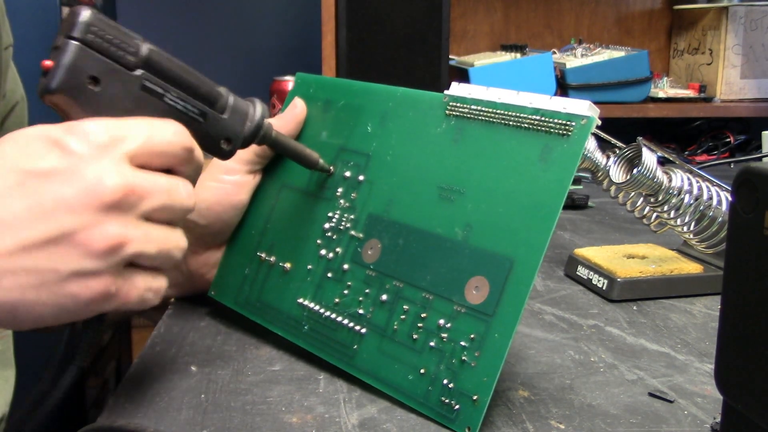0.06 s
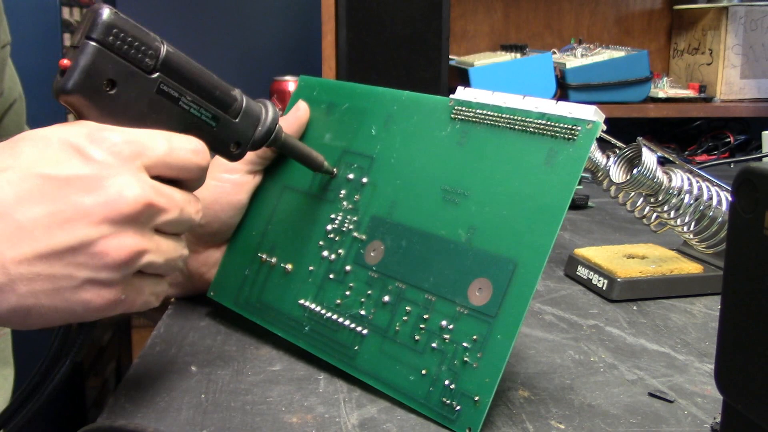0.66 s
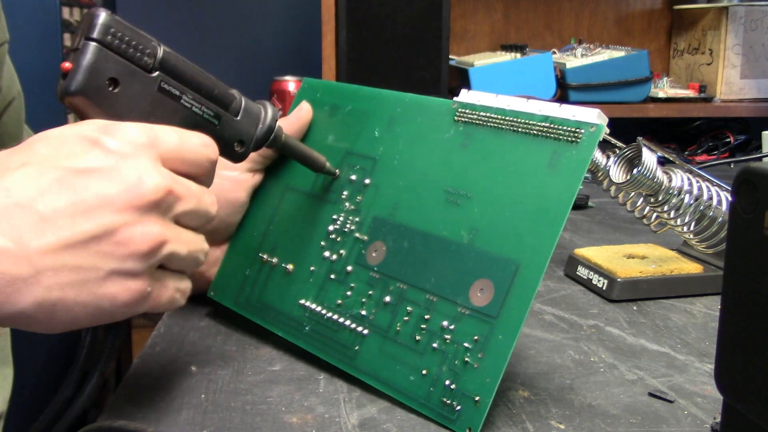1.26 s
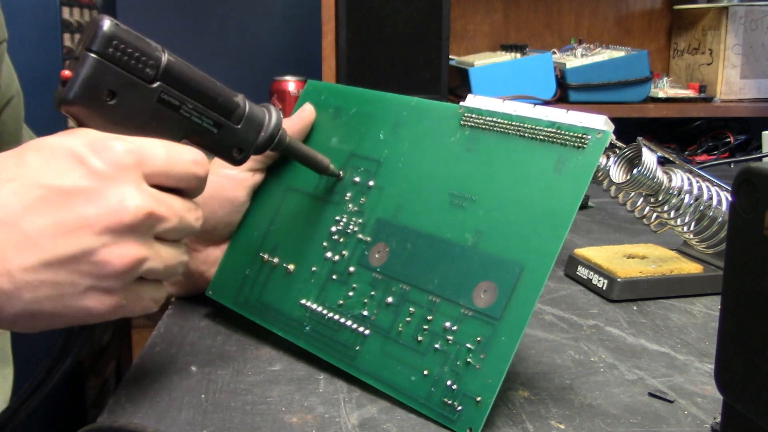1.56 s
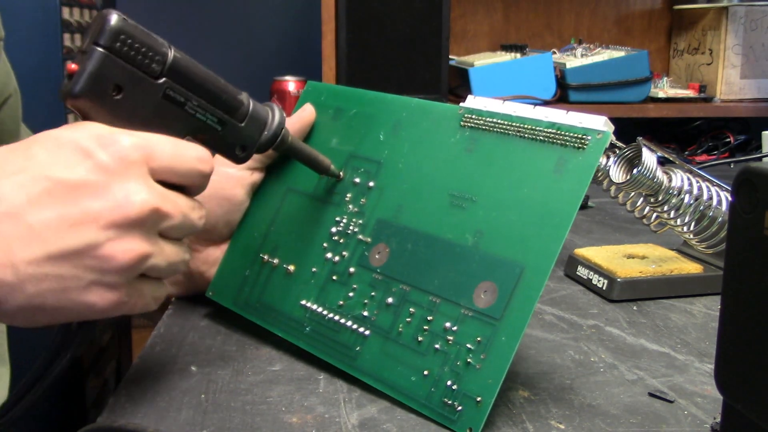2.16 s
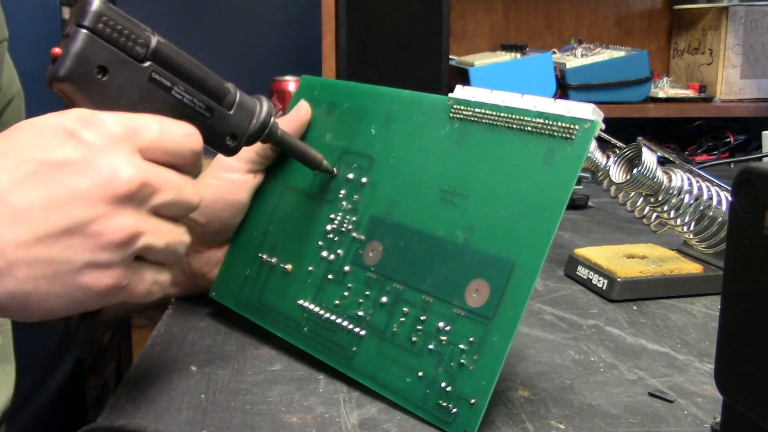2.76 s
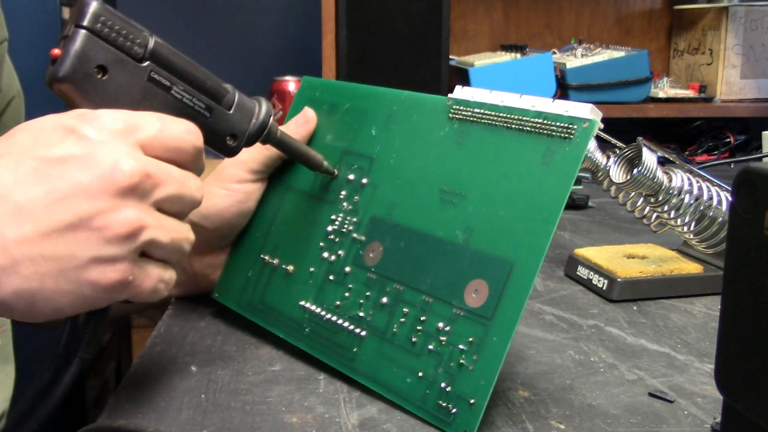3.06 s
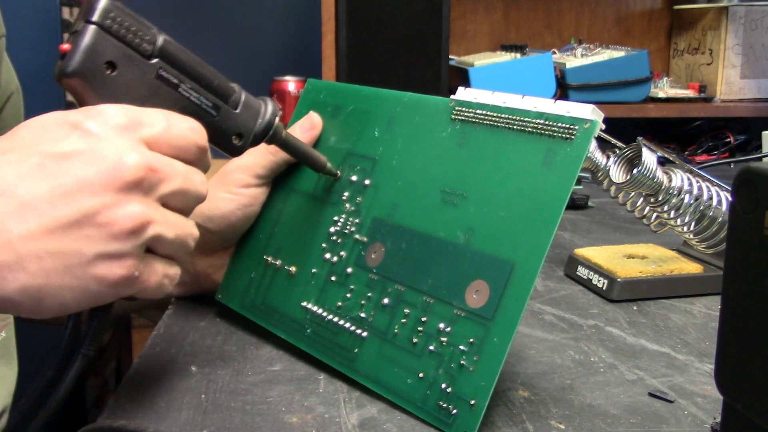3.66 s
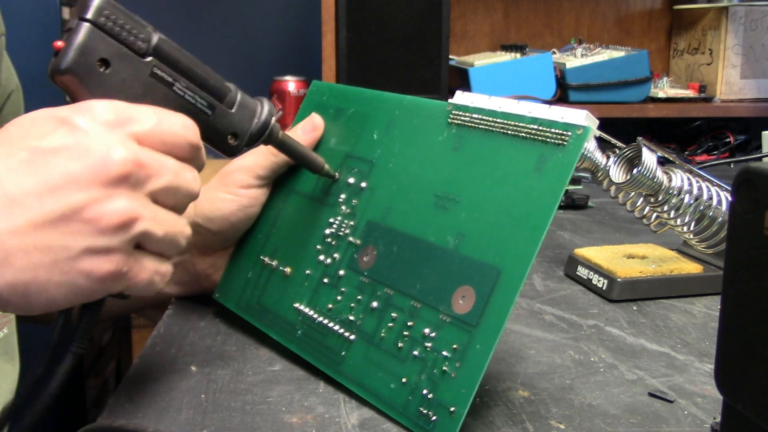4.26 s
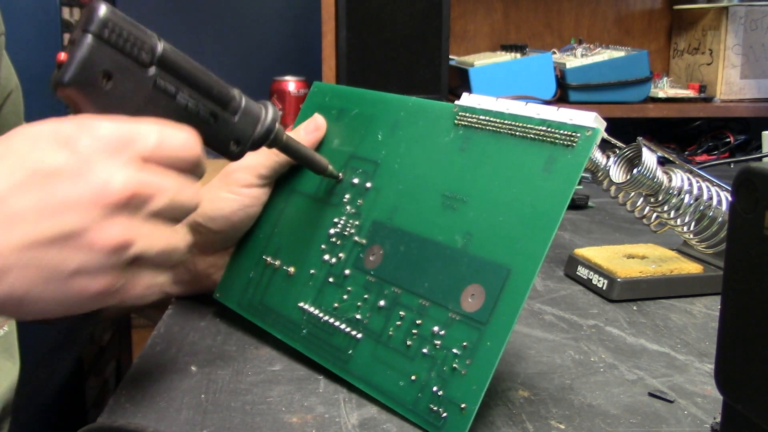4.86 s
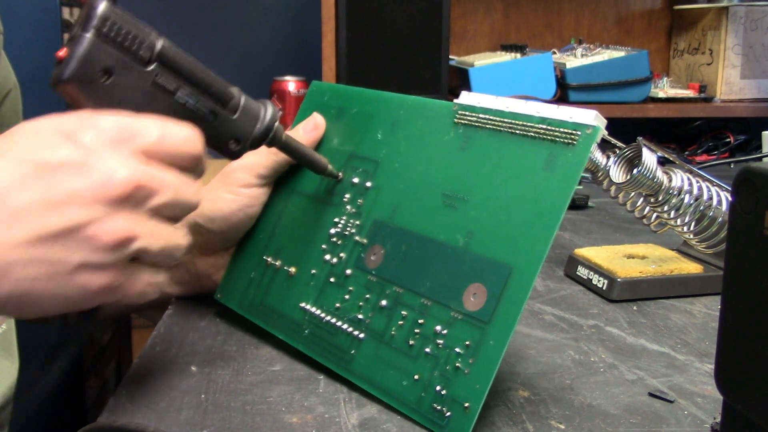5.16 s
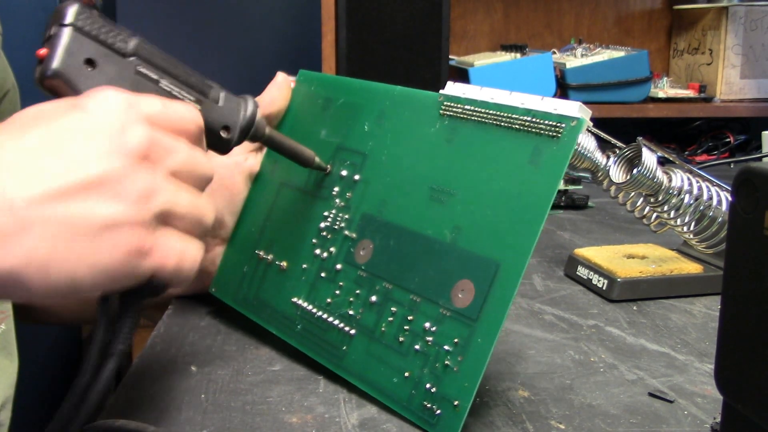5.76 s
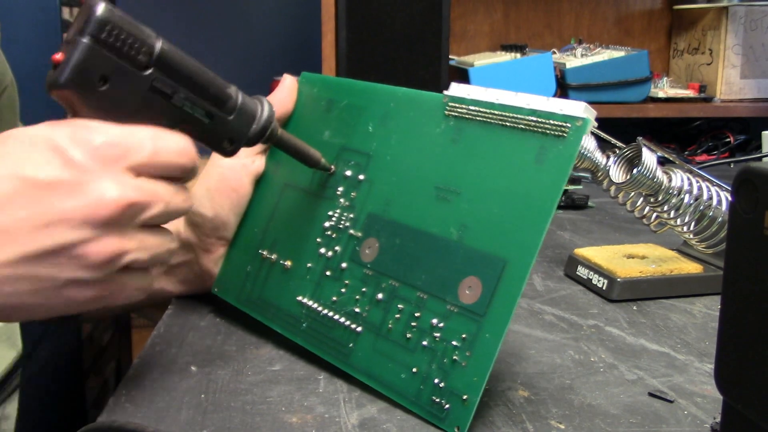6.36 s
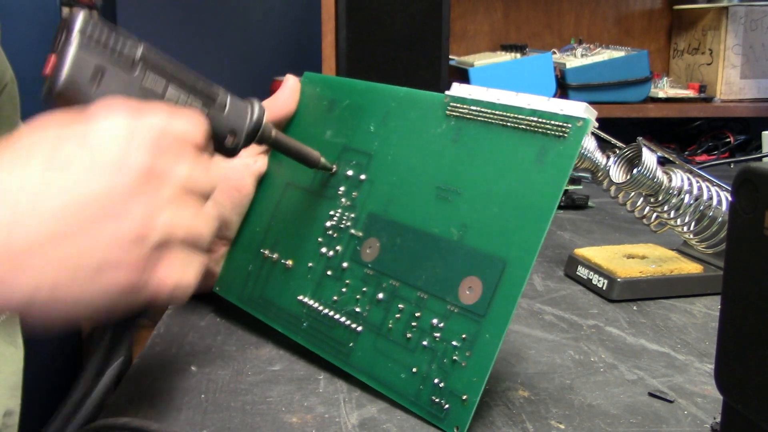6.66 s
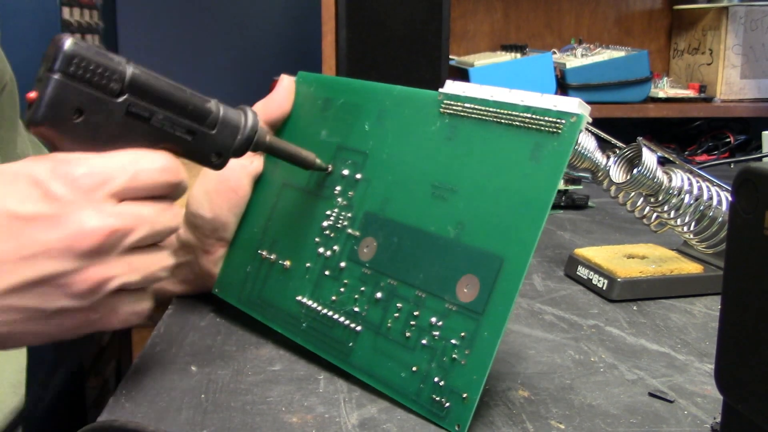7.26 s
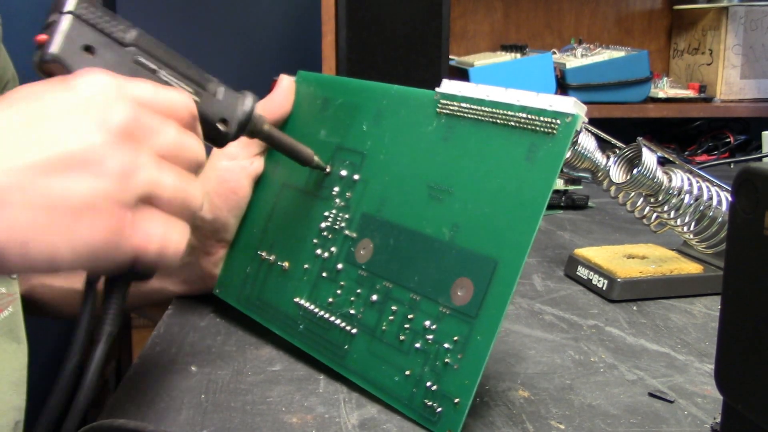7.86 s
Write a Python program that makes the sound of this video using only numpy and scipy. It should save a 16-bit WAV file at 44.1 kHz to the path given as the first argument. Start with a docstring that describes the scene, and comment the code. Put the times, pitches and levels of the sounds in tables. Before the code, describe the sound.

At first there is only a faint workshop hum. At about 0.6 seconds the plastic trigger of a desoldering gun snaps, and a small electric vacuum pump starts with a puff of air, reaching speed by 0.8 seconds. It runs close by with a rapid knocking, a steady motor hum and a bright, pulsing hiss, with a soft burble and a few tiny spits of air early on. Around 2 seconds molten solder slurps up the nozzle with a brief, rough, rising whistle. Between about 2.2 and 3.5 seconds some knocks falter, then the strokes become slightly harder and more even as the suction builds. The pump case gives short rattles near 2.7, 3.8, 5.2 and 7 seconds, and again just before the end. The pump is still running steadily at about 8 seconds.

```python
"""The diaphragm pump of a desoldering station runs on a workbench, started by a click of the trigger.
Each shaft turn knocks the housing into free vibration, claps a valve shut and drives two hissing gasps
of air. As the vacuum builds, the strokes grow harder and more even and the motor hum firms up.
Now and then a knock falters or the case rattles, and once molten solder slurps up the nozzle.
Beneath it all lies the faint hum of the workshop."""
import sys
import numpy as np
from scipy import signal
from scipy.fft import rfft, irfft, next_fast_len
from scipy.io import wavfile

SR = 44100
rng = np.random.default_rng(int(sys.argv[2]) if len(sys.argv) > 2 else 0)


def put_to_file(sound):
    """Save the sound as 16-bit audio at rate SR, in the file named by the first command-line argument."""
    columns = np.atleast_2d(sound).T  # one column per channel
    safe = np.clip(columns, -1, 1)
    whole_steps = np.round(safe * 32767)
    wavfile.write(sys.argv[1], SR, whole_steps.astype(np.int16))


N = 348831
TIME = np.arange(N) / SR
FFT_SIZE = next_fast_len(N + SR // 2)  # room for filter tails
HZ = np.fft.rfftfreq(FFT_SIZE, 1 / SR)

SHAFT_HZ, FIRST_KNOCK_S = 28.8513, .7833
START_S, SPIN_UP_S = .617, .165
SCATTER_OPEN_DB, SCATTER_TIGHT_DB = 1.3, .5  # stroke scatter: line open, full vacuum

# modes of the housing: f/Hz, level/dB, T60/s
HOUSING_MODES = [(149.4, -20, 0.036), (288, -15.5, 0.096), (313.6, -17, 0.088), (340, -6, 0.023),
                 (413.5, -10, 0.033), (424.8, -22, 0.16), (538.5, -25, 0.13), (721.7, -5.5, 0.028),
                 (782.6, -4, 0.021), (805.5, -13, 0.045), (969.4, -7.5, 0.073), (1306, -13, 0.021),
                 (1336, -12.5, 0.033)]
# knocks that are unusually hard or weak: t/s, number of turns, level change/dB
ODD_STROKES = [(.783, 2, 2.5), (2.239, 1, -7), (2.378, 1, -9), (2.586, 2, -4), (2.863, 2, 2),
               (3.036, 3, -9), (3.175, 1, 3), (3.279, 2, -9), (3.418, 1, -8)]
# modes of the valve flap: f/Hz, level/dB, T60/s
FLAP_MODES = [(1320, -21, 0.02), (1750, -29.5, 0.03), (2846, -23.5, 0.016), (3530, -31.5, .014),
              (5950, -32, 0.013)]
# resonances of the valve chamber: f/Hz, bandwidth/Hz, level/dB
CHAMBER_RESONANCES = [(423, 42, 8), (735, 53, 8), (992, 39, -1.5), (1296, 118, 4.5), (1710, 17.4, 5.5),
                      (2360, 65, -8), (2636, 220, -13), (3300, 120, -14), (4130, 150, -18),
                      (5450, 370, -16.5), (6030, 810, -18.5)]
# spits of air at the valve: t/s, level/dB
SPIT_EVENTS = [(1.048, -19.5), (1.082, -16), (1.152, -21), (1.185, -22), (2.050, -22), (2.154, -22),
               (3.126, -26), (3.335, -22.5), (3.438, -23)]
# resonances of the spits: f/Hz, bandwidth/Hz, level/dB
SPIT_RESONANCES = [(2760, 120, 2.5), (3700, 230, 0), (5520, 570, 1), (6130, 150, 1)]
# motor harmonics: multiple of the shaft rate, level with the line open/dB, level at full vacuum/dB
MOTOR_HARMONICS = [(4, -49, -44.5), (6, -53, -37.5), (8, -35, -34), (10, -33, -31.5), (14, -28.5, -29.5),
                   (17, -37, -35)]
# spectrum of the air hiss: f/Hz, relative level/dB
HISS_SPECTRUM = [(900, -7), (1800, -11), (2800, -4), (4000, -7), (4800, -11), (5600, -5.5), (7200, 2),
                 (11000, -2), (11800, -7), (13200, -3.5), (14500, -23), (15800, -30)]
# resonances of the air path: f/Hz, bandwidth/Hz, level/dB
PIPE_RESONANCES = [(2414, 104, 7.5), (2880, 150, -3), (3960, 80, 7), (5460, 140, 2.5), (5890, 82, 0),
                   (7640, 140, -11), (8320, 92, -5), (8670, 88, 4), (9370, 71, 1), (10250, 170, 4),
                   (11020, 370, 5.5), (12050, 210, 3), (12760, 130, -3), (13800, 150, -7), (14200, 130, 0)]
# spectrum of the churning motor: f/Hz, relative level/dB
CHURN_SPECTRUM = [(40, -57), (110, -15), (165, -17), (220, -7), (300, -1), (410, -8.5), (600, -12.5),
                  (740, -2.5), (830, -8.5), (970, -2), (1100, -9.5), (1400, -12), (2100, -29), (5000, -32)]
# resonances of the open line: f/Hz, bandwidth/Hz, level/dB
LINE_RESONANCES = [(255, 75, -0.5), (407, 43, -5.5)]
# fits of rattling: t/s, duration/s, level/dB
RATTLE_EVENTS = [(.77, 0.066, -24.5), (2.687, 0.081, -19.5), (3.803, 0.1, -15), (5.23, 0.08, -19),
                 (6.979, 0.085, -17), (7.353, 0.1, -22.5), (7.862, 0.094, -18)]
# spectrum of the chattering case: f/Hz, relative level/dB
CHATTER_SPECTRUM = [(40, -31), (105, -4), (200, 7.5), (380, 6.5), (600, -2), (750, 5.5), (1300, -2),
                    (2200, -7.5), (4000, -12.5), (6500, -16), (14000, -32)]
# low resonances of the case: f/Hz, bandwidth/Hz, level/dB
CASE_RESONANCES = [(116, 22, -3.5), (402, 38, 2)]
# clicks of the trigger: t/s, level/dB
CLICK_EVENTS = [(.193, -39), (0.517, -38), (0.5604, -13)]
# resonances of the trigger: f/Hz, bandwidth/Hz, level/dB
TRIGGER_RESONANCES = [(940, 370, 0.5), (2620, 1100, 0), (4240, 650, 2), (5460, 500, 6), (6400, 500, -6),
                      (7500, 310, 0), (9000, 1200, -32), (12400, 1200, -17)]
# hum of the workshop: f/Hz, level/dB
HUM_TONES = [(140, -52.5), (221, -56), (291, -68), (506, -56.5)]
# spectrum of the room noise: f/Hz, relative level/dB
ROOM_SPECTRUM = [(25, -18), (60, -27), (90, -29), (130, -5), (175, -14), (310, -12.5), (400, -15.5),
                 (515, -17), (660, -21), (1300, -27), (2500, -36.5), (7000, -46.5), (15000, -54)]
# echoes that differ between left and right: f/Hz, level/dB
SIDE_SPECTRUM = [(100, -36), (300, -56.5), (600, -19.5), (2000, -35), (4000, -22.5), (8000, -14),
                 (15000, -11)]
# stereo balance: f/Hz, left minus right level/dB
BALANCE = [(2500, 0), (4000, -.5), (8000, -2), (15000, -1.4)]


def knocks(open_db=-2.4, tight_db=.31, limp_s=.00019, jitter_s_per_db=.00008):
    """Impact excitation: the connecting rod rings the housing once a turn, harder under load."""
    times, limp = turns()
    size, late = rng.standard_normal((len(times), 2)).T
    scatter_db = loaded(times, SCATTER_OPEN_DB, SCATTER_TIGHT_DB)
    db = loaded(times, open_db, tight_db) + scatter_db * size
    for at, count, change_db in ODD_STROKES:
        first = np.argmin(abs(times - at))
        db[first:first + count] += change_db
    onsets = times + limp_s * limp + jitter_s_per_db * scatter_db * late
    return strike(onsets, spin(times) ** 2 * amp(db), ring(HOUSING_MODES))


def valve(clap_db=-30, thud_db=-16, thud_hz=330, thud_t60=.053, lag_s=.0198, decay_s=.0042):
    """Transient excitation: the flap shuts with a tick and a thud, and a puff sounds the chamber."""
    times, limp = turns()
    size, late = rng.standard_normal((len(times), 2)).T
    scatter_db = loaded(times, SCATTER_OPEN_DB, SCATTER_TIGHT_DB)
    force = amp(loaded(times, -9.5, -4.5) + .6 * limp + scatter_db * size)
    onsets = times + lag_s + .0002 * scatter_db * late  # on the return stroke
    t = TIME[:SR // 20]
    puff = noise() * strike(onsets, force, np.exp(-t / decay_s) * (1 - np.exp(-t / .0006)))
    clap = amp(clap_db) * unit(colour(puff, resonances(CHAMBER_RESONANCES)))
    thud = strike(onsets, force, -ring([(thud_hz, thud_db, thud_t60)]))
    tick = strike(onsets, amp(scatter_db * size - 2 * limp), ring(FLAP_MODES))
    return clap + thud + tick


def spits(decay_s=.0048):
    """Resonant noise bursts: on a few return strokes the valve spits air more sharply."""
    times, db = np.transpose(SPIT_EVENTS)
    envelope = strike(times, amp(db), np.exp(-TIME[:SR // 20] / decay_s))
    return envelope * shaped_noise(resonances(SPIT_RESONANCES))


def motor(waver_rad=.067, waver_hz=6, swell_db=1.5, swell_hz=1.34):
    """Harmonics of rotation: tones at multiples of the shaft rate waver and shift balance with load."""
    angle = 2 * np.pi * SHAFT_HZ * (TIME - FIRST_KNOCK_S) + waver_rad * drift(waver_hz)
    tones = 0
    for order, open_db, tight_db in MOTOR_HARMONICS:
        db = loaded(TIME, open_db, tight_db) + swell_db * drift(swell_hz)
        tones = tones + amp(db) * np.sin(order * angle)
    return spin(TIME) * np.sqrt(2) * tones


def inrush(hz=720, db=-31, lag_s=.017, width_s=.027):
    """Starting transient: the motor sings briefly as the current comes on."""
    envelope = np.exp(-((TIME - START_S - lag_s) / width_s) ** 2)
    return amp(db) * envelope * np.sin(2 * np.pi * hz * TIME)


def gasps(lag_s, width_s, db, limp_db, scatter_db=1, jitter_s=.00066):
    """Pulsating flow: one port passes a Gaussian puff each turn, stronger and weaker in alternation."""
    times, limp = turns()
    size, late = rng.standard_normal((len(times), 2)).T
    puff = np.exp(-((TIME[:SR // 15] - 1 / SHAFT_HZ) / width_s) ** 2)
    onsets = times + lag_s - 1 / SHAFT_HZ + jitter_s * late
    return strike(onsets, amp(db + scatter_db * size - limp_db * limp), puff)


def hiss(db=-28.5, leak=.22, broadband=1.04):
    """Modulated flow noise: intake and exhaust hiss in turn through the air path, over a steady leak."""
    intake = gasps(lag_s=.0071, width_s=.0065, db=.22, limp_db=-.3)
    exhaust = gasps(lag_s=.0253, width_s=.0029, db=0, limp_db=1.4)
    flow = (leak + intake + exhaust) * draught(open_db=-.8, tight_db=-.3, start_db=11)
    path = amp(spectrum(HISS_SPECTRUM)) * (broadband + resonances(PIPE_RESONANCES))
    comb = 1 + .37 * echoes(length_s=.012, count=14)  # reflections off the bench and shelves
    return amp(db) * unit(colour(noise() * flow, path * comb))


def churn():
    """Broadband machine noise: the motor churns low beneath the hiss."""
    envelope = draught(open_db=-24.5, tight_db=-24, start_db=-8)
    return envelope * shaped_noise(amp(spectrum(CHURN_SPECTRUM)))


def burble(db=-27):
    """Flow-driven resonance: air burbles in the open line and dies away as the vacuum builds."""
    envelope = amp(db) * spin(TIME) * (1 - vacuum(TIME))
    return envelope * shaped_noise(resonances(LINE_RESONANCES) ** 2)


def rattles(blows_per_s=500, grain=.42, boom_db=-4):
    """Random impacts: the case chatters in short fits of small blows and booms at its resonances."""
    envelope = sum(amp(db) * np.sin(np.pi * np.clip((TIME - at) / length, 0, 1))
                   for at, length, db in RATTLE_EVENTS)
    blows = noise() * (rng.random(N) < blows_per_s / SR)
    chatter = unit(colour(grain * unit(blows) + noise(), amp(spectrum(CHATTER_SPECTRUM))))
    boom = amp(boom_db) * shaped_noise(resonances(CASE_RESONANCES))
    return envelope * (chatter + boom)


def slurp(at_s=1.95, clogged_hz=3260, cleared_hz=4100, glide_s=.085, whistle_s=.19, burst_s=.024):
    """Flow noise and tones: air bursts through molten solder; two whistles rise as the bore clears."""
    age = np.maximum(TIME - at_s, 0)
    attack = np.minimum(age / .016, 1)
    release = np.exp(-np.maximum(age - .22, 0) / .077)
    hz = cleared_hz + (clogged_hz - cleared_hz) * np.exp(-age / glide_s)
    phase = 2 * np.pi * np.cumsum(hz) / SR
    upper = np.sin(phase + .8 * drift(width_hz=90))  # phase noise roughens the tones
    lower = np.sin(.54 * phase + 1.6 * drift(width_hz=90))
    whistles = amp(-34.5) * np.exp(-(age / whistle_s) ** 4) * (upper + lower)
    spray = shaped_noise(resonances([(2200, 310, 4), (2660, 790, 8), (3350, 1000, 3)]) ** 2)
    spray_db = -33 + 10 * np.exp(-(age / burst_s) ** 4)
    return attack * release * (amp(spray_db) * spray + whistles)


def trigger(attack_s=.00074, decay_s=.0013, tail_db=-24, tail_s=.04):
    """Impact and reflection: the switch snaps in its plastic grip; the bench returns a short tail."""
    times, db = np.transpose(CLICK_EVENTS)
    t = TIME[:SR // 8]
    decay = np.exp(-t / decay_s) + amp(tail_db) * np.exp(-t / tail_s)
    snap = decay * (1 - np.exp(-t / attack_s))
    return strike(times, amp(db), snap) * shaped_noise(resonances(TRIGGER_RESONANCES))


def workshop(room_db=-47.5, waver=.28):
    """Ambient noise floor: quiet room noise and hum tones under slow amplitude modulation."""
    hum = 0
    for hz, db in HUM_TONES:
        swell = 1 + waver * shaped_noise(np.exp(-HZ / 8))
        hum = hum + amp(db) * np.sqrt(2) * swell * np.sin(2 * np.pi * (hz * TIME + rng.random()))
    return hum + amp(room_db) * shaped_noise(amp(spectrum(ROOM_SPECTRUM)))


def turns():
    """Period doubling: the time of each shaft turn, and a limp whose sign alternates between turns."""
    n = np.arange(-4, 207)
    return FIRST_KNOCK_S + n / SHAFT_HZ, (-1.) ** n


def spin(t):
    """Run-up: a linear ramp of strength, 0 to 1, as the motor starts."""
    return np.clip((t - START_S) / SPIN_UP_S, 0, 1)


def vacuum(t, midpoint_s=2.65, build_s=.4):
    """Logistic growth: the share of full vacuum, 0 to 1, which loads the pump."""
    return .5 + .5 * np.tanh((t - midpoint_s) / (2 * build_s))


def loaded(t, at_open, at_tight):
    """Load dependence: a value moves from its open-line to its full-vacuum setting."""
    return at_open + (at_tight - at_open) * vacuum(t)


def draught(open_db, tight_db, start_db, attack_s=.0084, settle_s=.016):
    """Relaxation: the flow opens with the motor and settles to the level set by the load."""
    age = np.maximum(TIME - START_S, 0)
    db = loaded(TIME, open_db, tight_db) + start_db * np.exp(-age / settle_s)
    return np.minimum(age / attack_s, 1) * amp(db)


def ring(modes):
    """Modal superposition: damped sinusoids, with neighbouring modes in opposite phase."""
    t = TIME[:SR // 5]
    return -sum((-1) ** k * amp(db - 60 * t / t60) * np.sin(2 * np.pi * hz * t)
                for k, (hz, db, t60) in enumerate(modes))


def strike(times, sizes, shape):
    """Convolution: a train of scaled impulses repeats one shape."""
    train = np.zeros(N)
    inside = (times >= 0) & (times < TIME[-1])
    np.add.at(train, np.round(times[inside] * SR).astype(int), sizes[inside])
    return signal.oaconvolve(train, shape)[:N]


def resonances(rows):
    """Frequency response of damped resonators in parallel."""
    return sum(amp(db) * 1j * HZ * width / (hz ** 2 - HZ ** 2 + 1j * HZ * width)
               for hz, width, db in rows)


def echoes(length_s, count):
    """Interference: the frequency response of randomly delayed early echoes."""
    delays = rng.uniform(.054, 1, count) * length_s
    signs = rng.choice([-1, 1], count)
    taps = np.zeros(FFT_SIZE)
    np.add.at(taps, (delays * SR).astype(int), signs / np.sqrt(count))
    return rfft(taps)


def spectrum(points):
    """Interpolation of levels over logarithmic frequency."""
    hz, db = np.transpose(points)
    return np.interp(np.log(HZ + 1), np.log(hz + 1), db)


def colour(x, response):
    """Linear filtering by a frequency response."""
    return irfft(rfft(x, FFT_SIZE) * response, FFT_SIZE)[:N]


def noise():
    """White Gaussian noise."""
    return rng.standard_normal(N)


def shaped_noise(response):
    """Filtered noise of rms 1."""
    return unit(colour(noise(), response))


def drift(width_hz):
    """Random modulation: low-pass noise of rms 1."""
    return shaped_noise(np.exp(-(HZ / width_hz) ** 2))


def amp(db):
    """Level to amplitude ratio."""
    return 10 ** (np.asarray(db) / 20)


def unit(x):
    """Normalisation to rms 1."""
    return x / np.sqrt(np.mean(x ** 2) + 1e-20)


def scene():
    """Superposition: all sources add; echoes widen the image and the treble leans to the right."""
    pump = knocks() + valve() + spits() + inrush() + motor() + hiss() + churn() + burble() + rattles()
    mid = pump + slurp() + trigger() + workshop()
    side = colour(mid, amp(spectrum(SIDE_SPECTRUM)) * echoes(length_s=.025, count=40))
    lean = amp(spectrum(BALANCE) / 2)
    return np.array([colour(mid, lean) + side, colour(mid, 1 / lean) - side])


def record(dry, ceiling=.85, low_cut_hz=85, high_cut_hz=15750):
    """Soft saturation rounds the highest peaks; band limiting removes deep bass and extreme treble."""
    rounded = dry / (1 + (dry / ceiling) ** 8) ** (1 / 8)
    thin = signal.sosfilt(signal.butter(2, low_cut_hz, "high", fs=SR, output="sos"), rounded)
    low_pass = signal.firwin(511, high_cut_hz, window=("kaiser", 9), fs=SR)
    return signal.oaconvolve(thin, low_pass[None], "same")


dry = scene()
out = record(dry)
put_to_file(out)
```